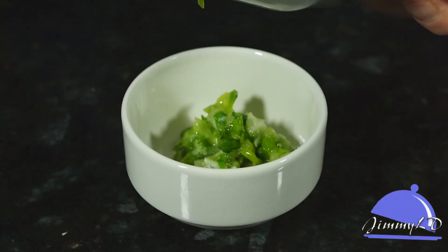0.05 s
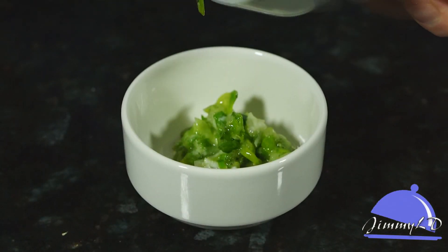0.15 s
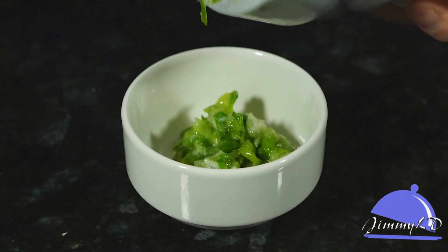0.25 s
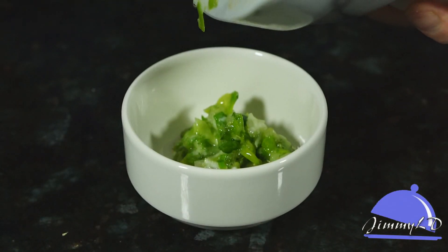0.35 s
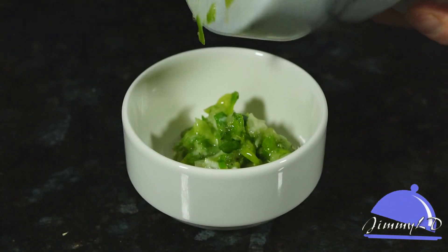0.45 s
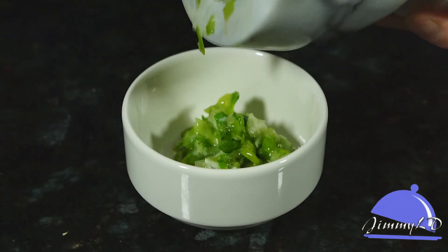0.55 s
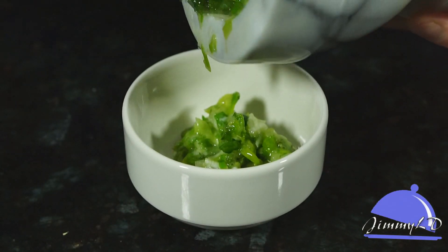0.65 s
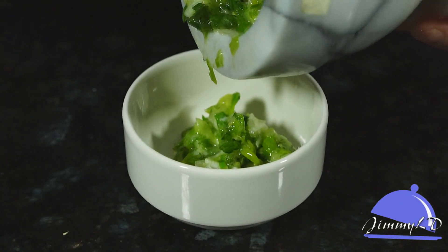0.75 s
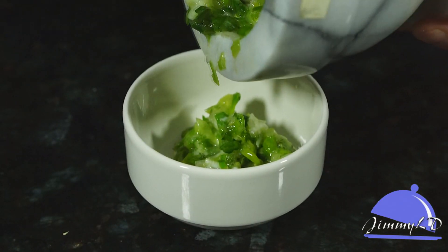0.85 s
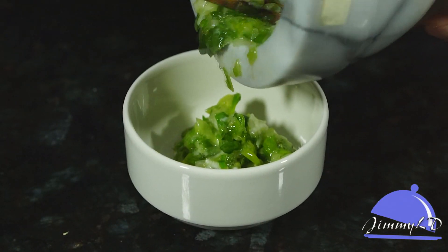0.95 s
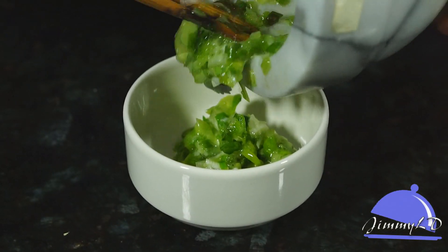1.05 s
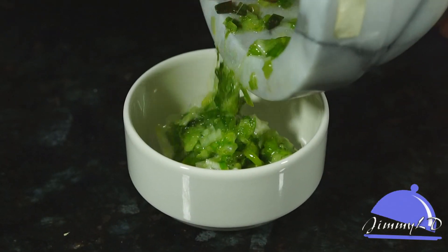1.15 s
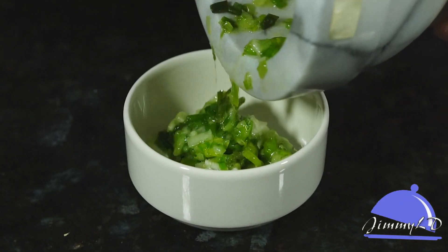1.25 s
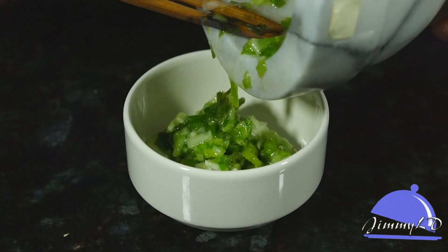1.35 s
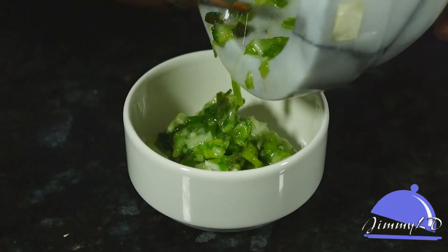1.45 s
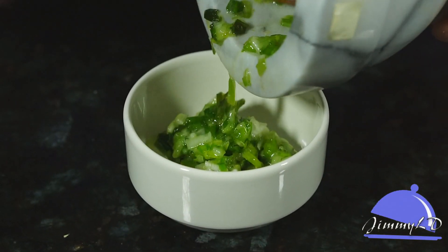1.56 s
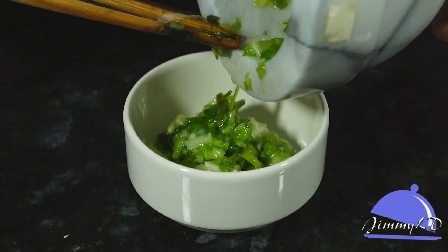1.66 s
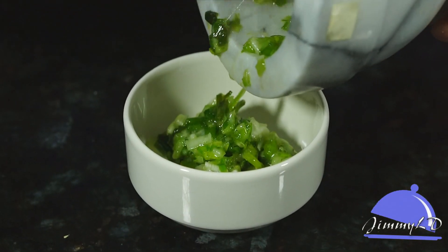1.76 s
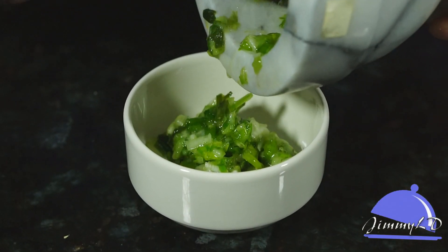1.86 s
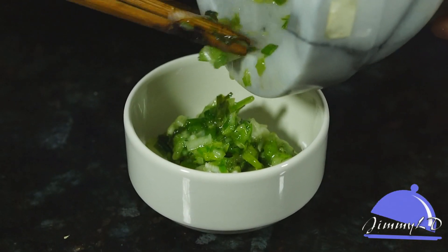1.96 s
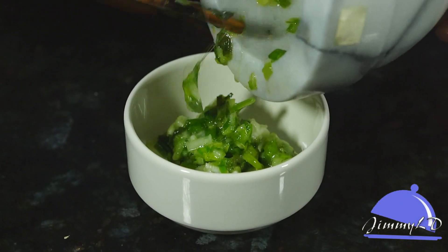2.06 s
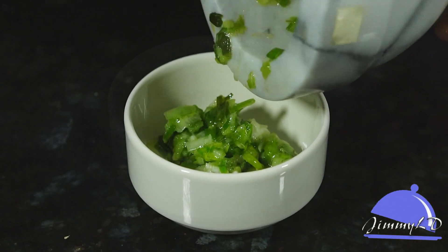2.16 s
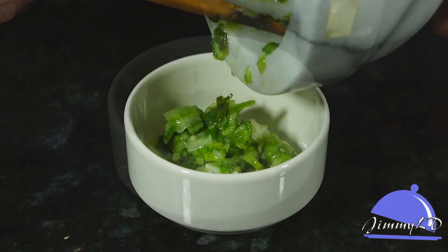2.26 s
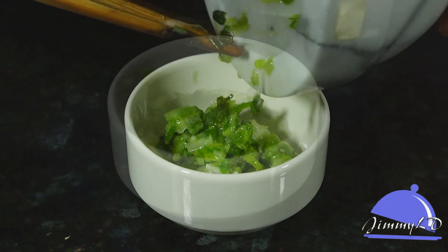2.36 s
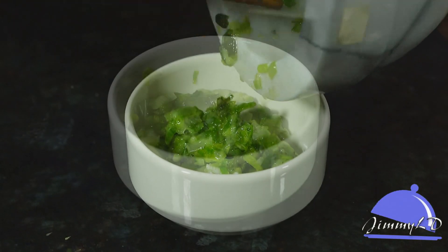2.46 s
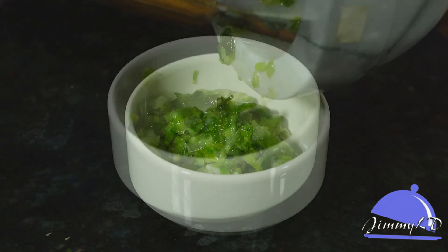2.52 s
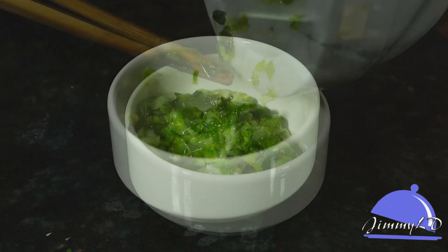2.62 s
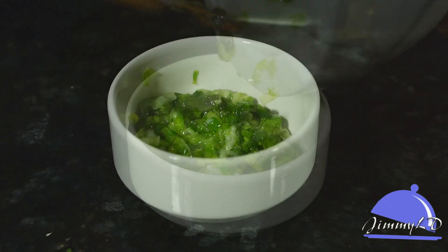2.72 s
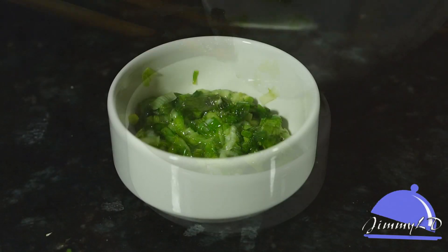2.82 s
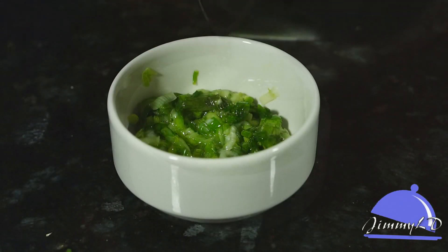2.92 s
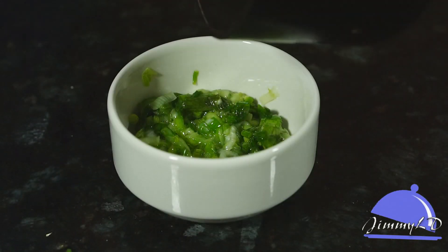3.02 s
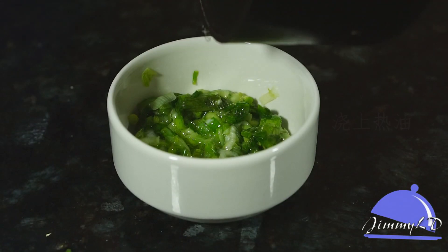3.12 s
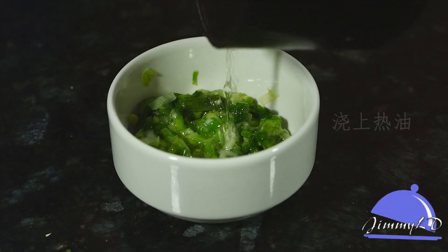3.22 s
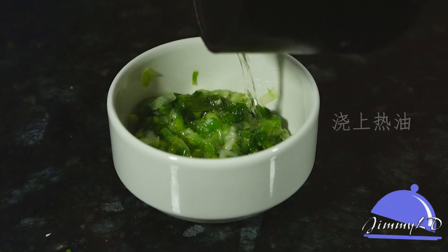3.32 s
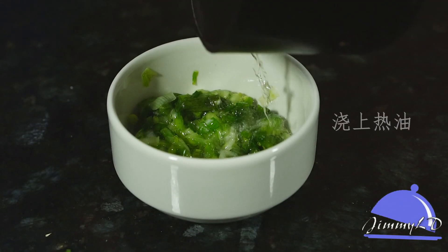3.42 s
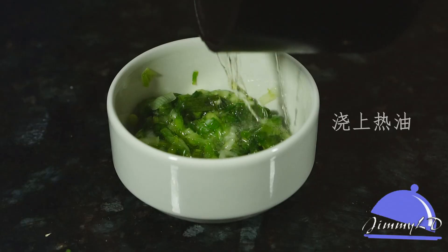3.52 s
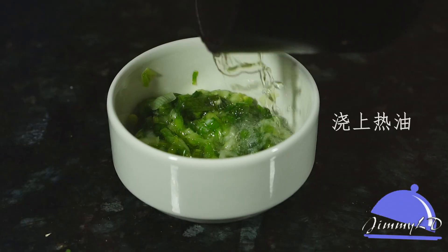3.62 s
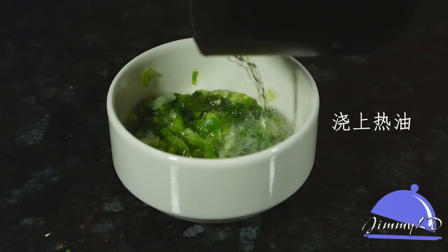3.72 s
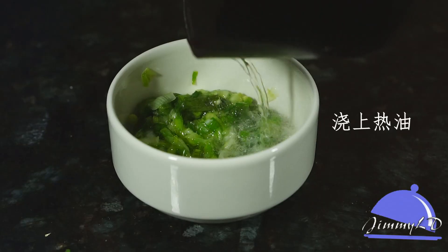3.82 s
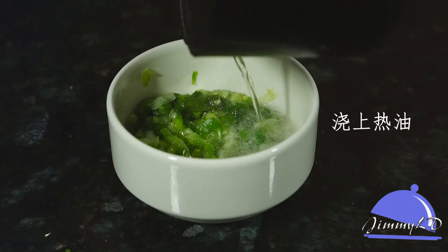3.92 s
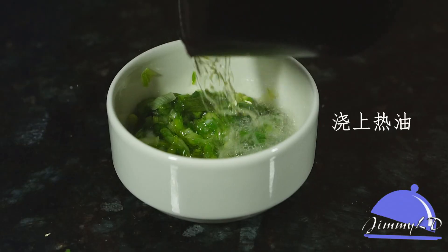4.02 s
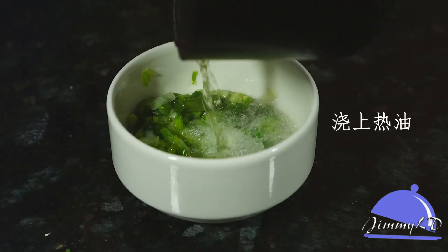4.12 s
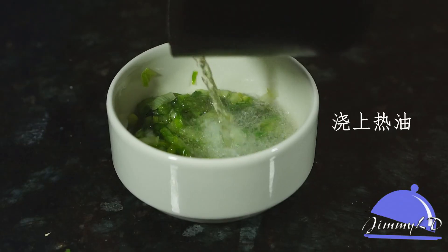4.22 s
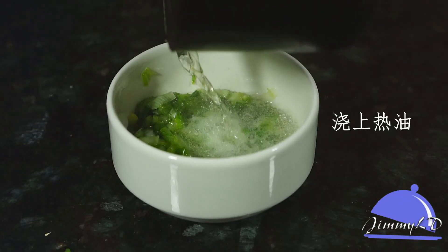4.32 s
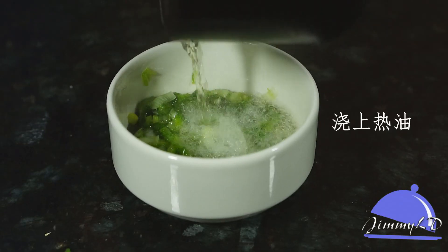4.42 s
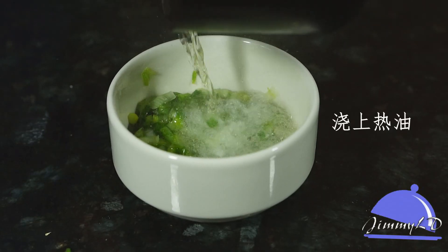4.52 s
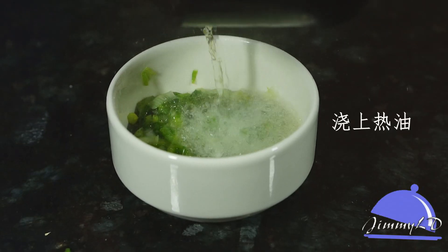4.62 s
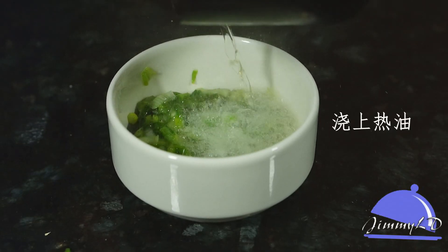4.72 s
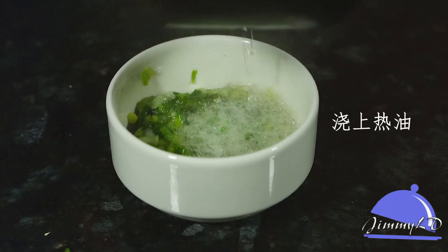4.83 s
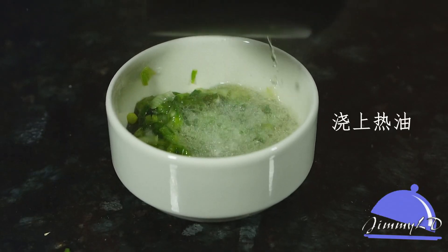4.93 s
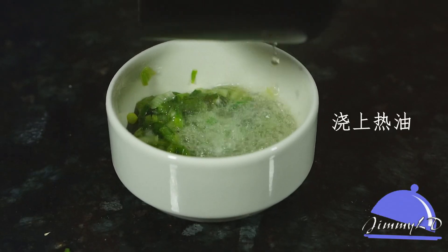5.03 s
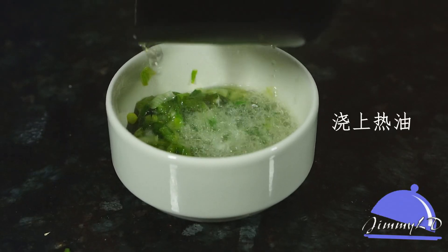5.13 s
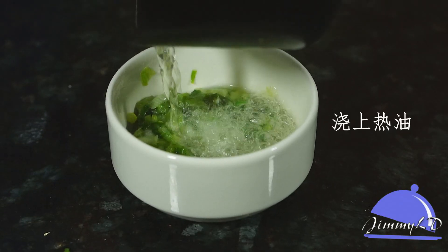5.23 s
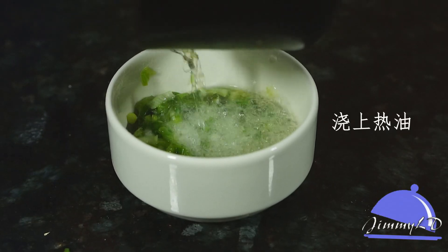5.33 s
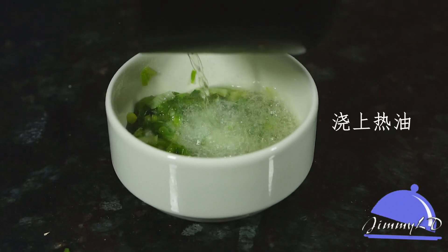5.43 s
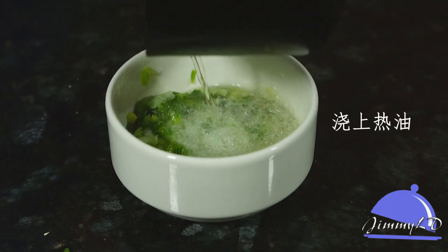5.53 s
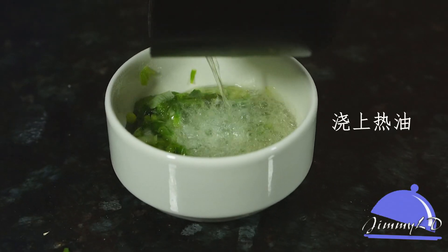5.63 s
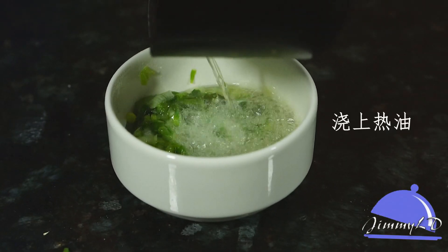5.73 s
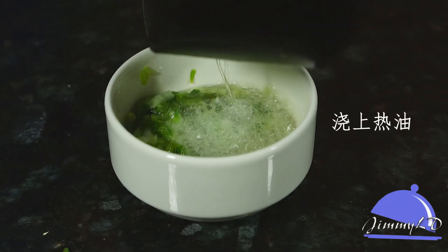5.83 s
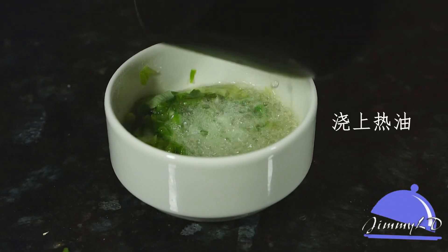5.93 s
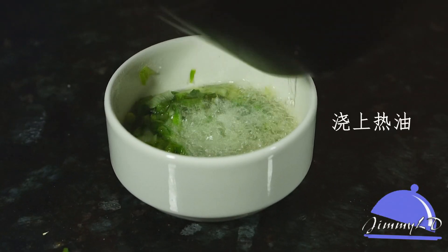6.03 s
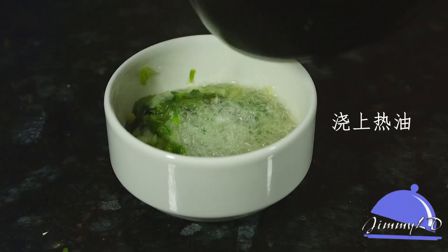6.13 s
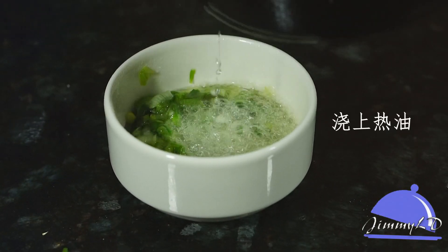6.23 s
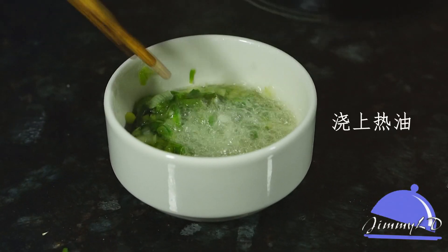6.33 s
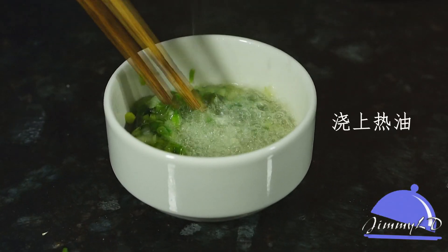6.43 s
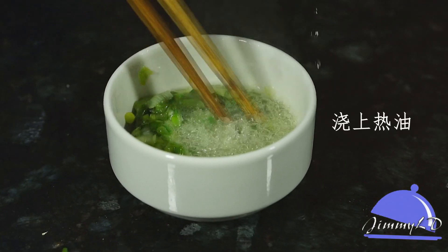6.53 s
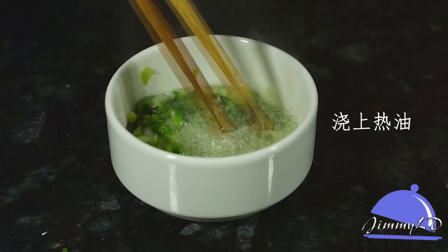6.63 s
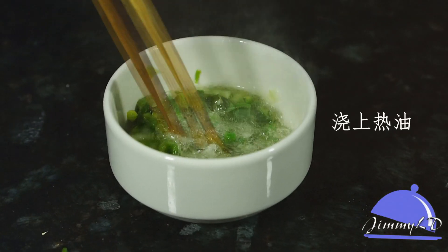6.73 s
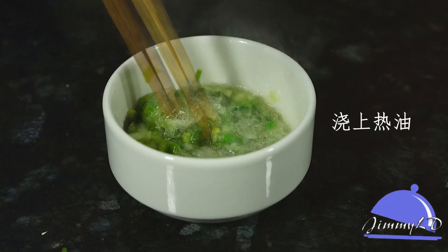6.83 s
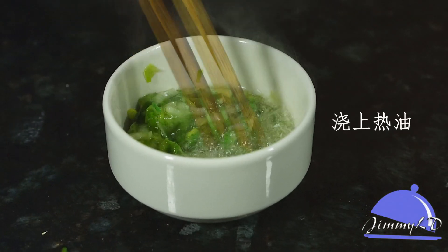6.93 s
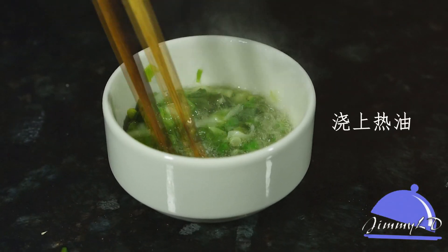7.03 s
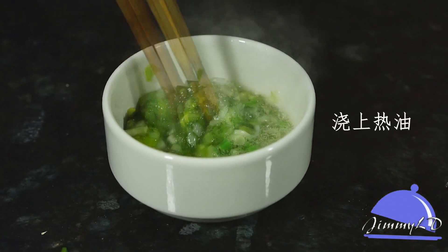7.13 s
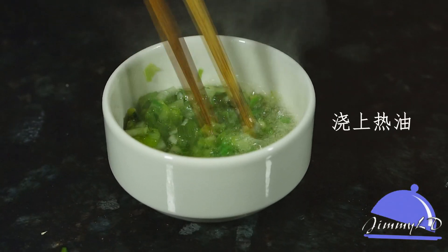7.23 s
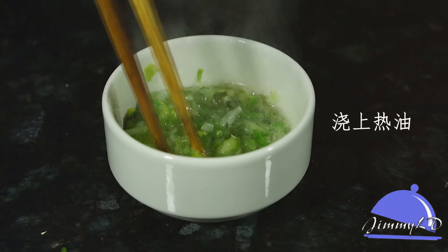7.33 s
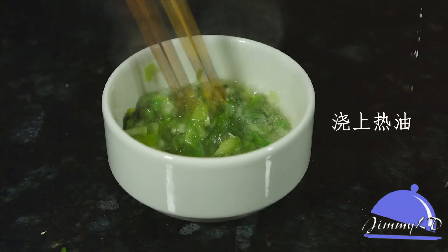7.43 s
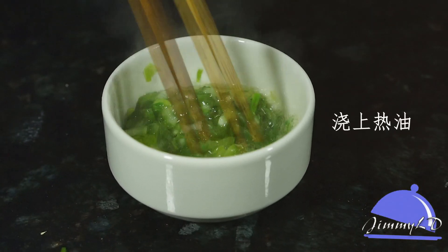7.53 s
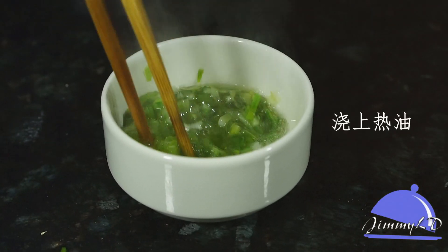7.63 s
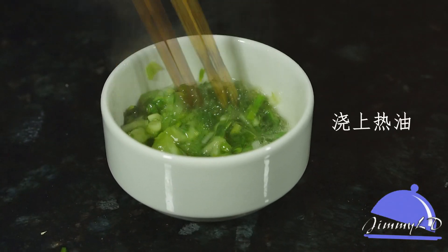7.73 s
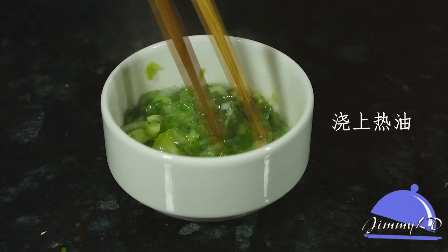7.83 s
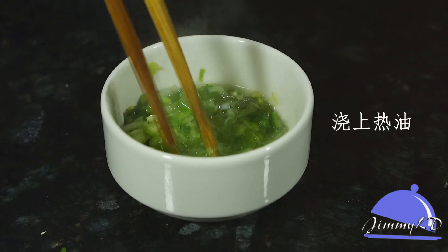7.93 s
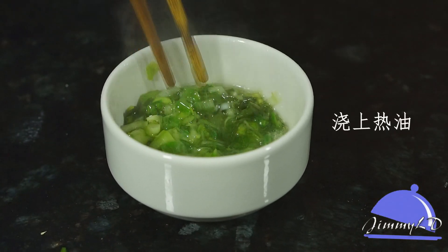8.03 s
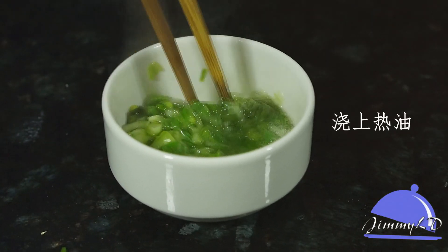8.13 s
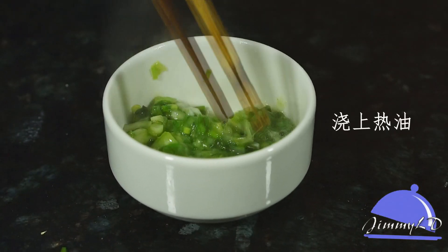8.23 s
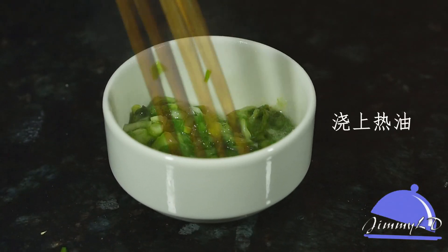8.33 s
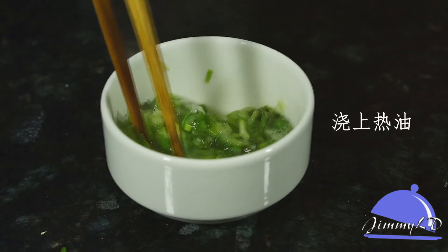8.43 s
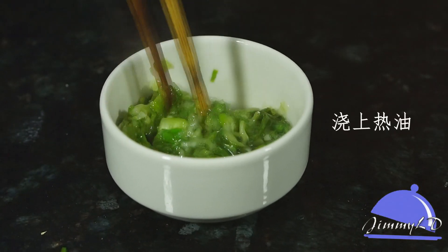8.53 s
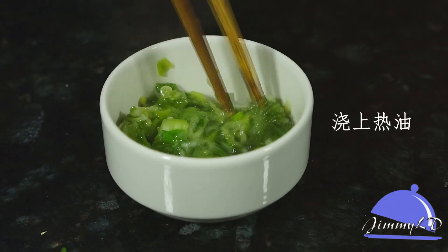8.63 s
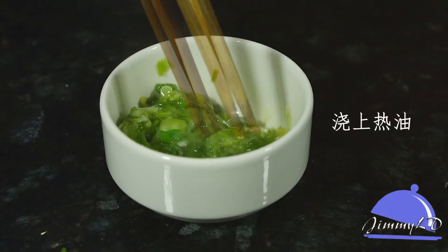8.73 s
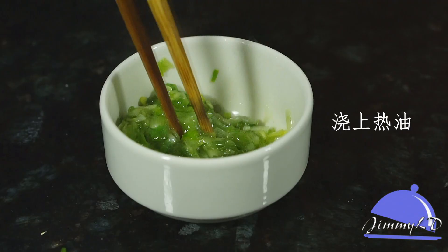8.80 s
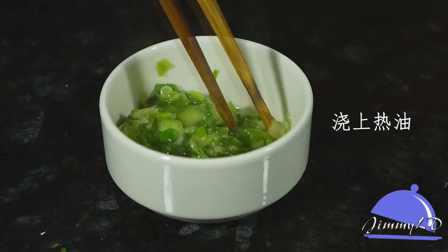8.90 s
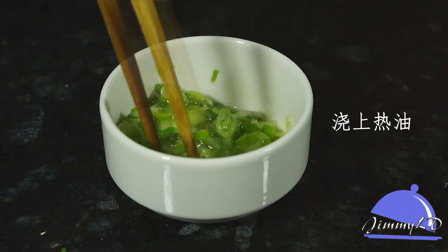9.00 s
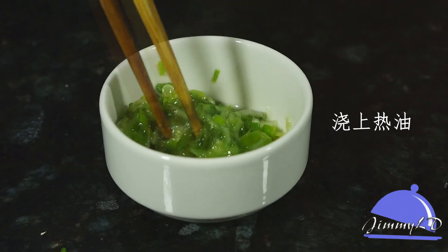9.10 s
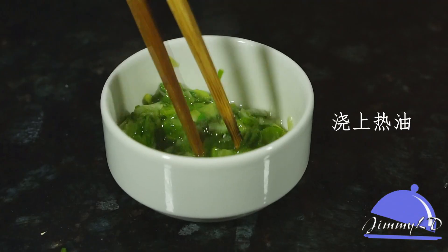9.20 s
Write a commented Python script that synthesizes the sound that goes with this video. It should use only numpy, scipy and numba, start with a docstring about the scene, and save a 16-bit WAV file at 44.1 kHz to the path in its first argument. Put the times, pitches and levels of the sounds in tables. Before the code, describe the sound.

A close stereo microphone in a small kitchen, with a faint fan-like hum. From 0 to 1 second, wooden chopsticks tap a stone mortar slightly left: crisp clustered ticks, hollow cup knocks, a thin high stone ring near 0.5, and short gritty scrapes. Softer, sparser taps and scrapes continue to about 3.1. At 3.4 hot oil meets wet herb paste and a bright spitting sizzle leaps up, thickening with froth and faint gurgling. It surges in flares, strongest around 4.5 to 5, and spits afresh at 5.35. From 6.4 sharp crackles and pops stand out; a chopstick knocks the oil-filled bowl dully at 6.7. The sizzle thins quickly after 7, breaking into scattered bursts by 8. Two more knocks come at 8.3 and 8.5, the second clickier, then a tiny tap near 9 as the last fizz fades into hum at 9.3.

```python
"""Kitchen: wooden chopsticks tap and scrape herb paste out of a stone mortar, left of a close stereo microphone.
Taps and scrapes are chattering or gritty forces on ringing modes of stone and hollow cup.
Hot oil is then poured on the paste in a small bowl: thousands of random bubble rings spit, froth and gurgle,
and die down while chopsticks knock the bowl. A fan-like hum of banded noise fills the background."""
import sys
import numpy as np
from scipy import signal
from scipy.fft import rfft, irfft, next_fast_len
from scipy.io import wavfile
from scipy.ndimage import uniform_filter1d
from numba import njit

SR = 44100
rng = np.random.default_rng(int(sys.argv[2]) if len(sys.argv) > 2 else 0)


def invert_db(x):
    """Field ratio 10**(x/20) for x, a level in decibels (scalar or array-like)."""
    u = np.asarray(x, float) / 20
    return 10 ** u


def file_out(sig):
    """Save sig as 16-bit WAV at sys.argv[1]."""
    # one column per channel
    cols = np.atleast_2d(sig).T
    # limit, then scale
    lim = np.clip(cols, -1, 1)
    pcm = np.round(lim * 32767).astype(np.int16)
    wavfile.write(sys.argv[1], SR, pcm)


N = 408354
T = np.arange(N) / SR


def unit(x):
    """Scale to rms 1."""
    return x / np.sqrt(np.mean(x ** 2))


def peak(x, db):
    """Scale the largest magnitude to a level."""
    return x * invert_db(db) / np.max(np.abs(x))


def curves(table):
    """Value columns of a time table as sample-rate curves; -120 dB outside it."""
    s, *columns = np.transpose(table)
    return [np.interp(T, s, c, left=-120, right=-120) for c in columns]


def colour(x, points, bands=(), bands_db=0, lo_hz=1, hi_hz=SR):
    """Filter by a spectrum of points plus resonant bands, between two edges; rms 1."""
    size = next_fast_len(N)
    hz = np.arange(1, size // 2 + 2) * SR / size
    point_hz, point_db = np.transpose(points)
    power = invert_db(2 * np.interp(np.log(hz), np.log(point_hz), point_db))
    for centre_hz, width_hz, db in bands:
        power = power + invert_db(2 * (db + bands_db)) / (1 + (2 * (hz - centre_hz) / width_hz) ** 2) ** 2
    power = power / (1 + (lo_hz / hz) ** 6) / (1 + (hz / hi_hz) ** 12)
    return unit(irfft(rfft(x, size) * np.sqrt(power), size)[..., :N])


@njit
def add(out, start, hz, t60, size, glide):
    """Add decaying sines; glide = relative rise of pitch over the ring."""
    for k in range(len(start)):
        steps = min(int(t60[k] * SR), len(out) - start[k])
        z = size[k] + 0j
        p = np.exp(2j * np.pi * hz[k] / SR - np.log(1000) / (t60[k] * SR))
        turn = np.exp(2j * np.pi * hz[k] * glide / (SR * SR * t60[k]))
        for i in range(steps):
            out[start[k] + i] += z.imag
            z *= p
            p *= turn


def ring(force, modes):
    """A force drives decaying modes (pitch_hz, level_db, t60_s)."""
    t = T[:SR // 2]
    body = sum(invert_db(db) * np.exp(-np.log(1000) * t / t60) * np.sin(2 * np.pi * hz * t) for hz, db, t60 in modes)
    return signal.oaconvolve(force, body)[:len(force)]


def bubbles(count, lo_hz, hi_hz, cycles, spread_db, glide):
    """Random bubbles: many small, a few large; each rings some cycles as it bursts."""
    when, pitch, rank, length = rng.random((count, 4)).T
    start = (when * N).astype(np.int64)
    hz = lo_hz + (hi_hz - lo_hz) * pitch
    t60 = cycles * (.5 + length) / hz
    big = np.minimum(-np.log(1 - rank), 5.5)
    size = invert_db((big - 1.5) * spread_db[start]) / np.sqrt(t60)
    out = np.zeros(N)
    add(out, start, hz, t60, size, glide)
    return out


def walk(rate_hz):
    """Random levels held 1 / rate_hz and slewed twice; spread near 1."""
    k = int(SR / rate_hz)
    held = np.repeat(rng.standard_normal(N // k + 1), k)
    return 1.31 * uniform_filter1d(uniform_filter1d(held, k), k)[:N]


def thin(x, hz):
    """Small things radiate no bass: high-pass."""
    return signal.sosfilt(signal.butter(3, hz, "high", fs=SR, output="sos"), x)


def place(table, sounds):
    """Start each sound at the time of its row."""
    out = np.zeros(N + SR)
    for row, sound in zip(table, sounds):
        out[int(row[0] * SR):][:len(sound)] += sound
    return out[:N]


def sides(pan_db):
    """Left and right gains for a left-minus-right level."""
    return invert_db(np.array([[pan_db], [-pan_db]]) / 2)


def room(x, t60, wet_db, side_db):
    """Counter and walls send back a tail, other in each ear; its bright part dies four times as fast."""
    t = T[:SR // 2]
    bright, dull = rng.standard_normal((2, 2, len(t)))
    dull = signal.sosfilt(signal.butter(2, 2500, fs=SR, output="sos"), dull)
    decay = np.exp(-np.log(1000) * t / t60)
    mid, side = dull * decay + bright * decay ** 4
    tails = np.array([mid + invert_db(side_db) * side, mid - invert_db(side_db) * side])
    tails = tails / np.sqrt(np.sum(mid ** 2))
    return x + invert_db(wet_db) * signal.oaconvolve(x, tails, axes=1)[:, :N]


# chopstick taps on mortar; the 0.473 s row is mostly a stone ring under a scrape:
# start_s, tick_db, ring_db, knock_db (ring and knock relative to tick)
TAP_HITS = [(.0034, -13.5, -67, -17), (0.0095, -16.5, -60, -7.5), (0.245, -11.5, -63, -3),
            (0.2528, -17.5, -62, -35), (0.4425, -14.5, -18, -14.5), (0.446, -11.5, -18, -29.5),
            (0.473, -35, 0, -20.5), (0.662, -16.5, -8.5, -11), (0.756, -25, -9, -12),
            (0.9692, -29, -12.5, -3.5), (1.4135, -32, -17, -11), (1.6511, -19, -14, -8),
            (2.02, -20, -20, -18), (2.3645, -20, -30, -10), (2.689, -28, -21, -14),
            (2.917, -26, -20, -11.5), (2.922, -35.5, -56, -5), (3.12, -39.5, -35, -14)]
# stone modes: pitch_hz, level_db, t60_s
STONE_MODES = [(4241, -2, .08), (4243, -3, .38)]
# modes of the air in the cup: pitch_hz, level_db, t60_s
CUP_MODES = [(1035, 9.5, 0.0093), (1923, 3.5, 0.0077), (2110, 4.5, 0.0038)]
RIM_FROM_S = .4  # later taps land near the rim and knock thinner


def taps():
    """Each contact chatters for some milliseconds: a broad tick, the cup's knock and the long stone ring."""
    t = T[:SR // 2]
    push = (t == 0) * 1.
    tick_modes = [(4800, -21.0, 0.0018), (9030, -2.0, 0.00052)]  # pitch_hz, level_db, t60_s
    blows, rings = [], []
    for start_s, tick_db, ring_db, knock_db in TAP_HITS:
        chatter = rng.standard_normal(len(t))
        tick_force = 1.1 * push + chatter * np.exp(-t / 0.0018)
        knock_force = push + 0.022 * chatter * np.exp(-t / 0.00017)
        tick = thin(ring(tick_force, tick_modes), 3200)
        knock = thin(ring(knock_force, CUP_MODES), 1000 if start_s < RIM_FROM_S else 1750)
        blows.append(peak(tick, tick_db) + peak(knock, tick_db + knock_db))
        rings.append(peak(thin(ring(push, STONE_MODES), 2800), tick_db + ring_db))
    waver = invert_db(2.5 * walk(30))  # the ring's level wavers at random
    contact = room(place(TAP_HITS, blows) * sides(4.8), 0.81, -10.0, -1.7)
    return contact + place(TAP_HITS, rings) * waver * sides(5.3)


# strokes over the stone: start_s, length_s, grit_db, rumble_db
STROKES = [(0.022, 0.071, -40, -46.5), (0.257, 0.07, -39.5, -45), (0.482, 0.076, -40.5, -61),
           (0.694, 0.098, -50, -66), (0.923, 0.15, -45, -58), (1.413, 0.16, -57, -62.5),
           (1.662, 0.14, -54, -62), (2.006, 0.11, -53.5, -69), (2.357, 0.084, -48, -66)]
# grit spectrum: freq_hz, density_db (per Hz)
GRIT_SPECTRUM = [(1470, -53), (2500, -12.5), (5000, -8.5), (8080, -10), (9440, -3), (16000, -8.5)]


def scrape():
    """Dense grit clicks under the stick; they also stir the cup's air."""
    clicks = rng.standard_normal(N) * invert_db(3.5 * walk(900) + 1.5 * walk(100))
    grit, rumble = np.zeros((2, N))
    for start_s, length_s, grit_db, rumble_db in STROKES:
        # pressure builds quickly, eases and lets go
        stroke = np.interp(T - start_s, [0, .012, length_s, length_s + 0.043], [0.033, 1, 0.43, 0.0044])
        grit = grit + invert_db(grit_db) * stroke
        rumble = rumble + invert_db(rumble_db) * stroke
    cup = thin(ring(clicks * rumble, CUP_MODES), 950) / np.std(ring(clicks, CUP_MODES))
    return room((grit * colour(clicks, GRIT_SPECTRUM) + cup) * sides(2.9), 0.49, -1.0, 1.6)


# oil spectrum: freq_hz, density_db (per Hz)
OIL_SPECTRUM = [(25, -34), (335, -28), (607, -28), (911, -10), (2910, -12), (5730, 0.5), (7710, 4),
                (14800, 6), (16000, 8)]
# resonances of the air in the bowl: centre_hz, width_hz, level_db
BOWL_AIR_BANDS = [(626, 163, -12), (2136, 370, -10.5), (3030, 930, -6), (7490, 1500, 3), (10420, 1400, 4.5),
                  (11830, 1200, 3.5)]
# strength of the boil, first drops, full stream, then cooling oil: time_s, level_db
BOIL_LEVEL = [(3.375, -87), (3.395, -33.5), (3.46, -33), (3.48, -27), (4.1, -25.5), (4.75, -23.5),
              (5.3, -29), (5.95, -26), (6.3, -28.5), (7.0, -30), (7.7, -38), (8.0, -43), (9.26, -62)]
# level of the froth, the 2-4 kHz body of the frying: time_s, level_db
FROTH_LEVEL = [(3.375, -80), (3.4, -49), (3.46, -48), (3.51, -32), (3.62, -38.5), (4.09, -37),
               (4.21, -30.5), (4.47, -34), (4.53, -29.5), (4.88, -32.5), (4.94, -27.5), (5.1, -31.5),
               (5.54, -33.5), (5.6, -30), (6.15, -29.5), (6.2, -33.5), (7.06, -34.5), (8.32, -53),
               (9.26, -71)]
# short bright pops in the sizzle, and a late chopstick tap at 8.957 s: start_s, peak_db, pitch_hz
BRIGHT_POPS = [(3.715, -14.5, 2830), (6.403, -7.5, 8450), (6.435, -14, 2820), (6.464, -10.5, 3600),
               (6.647, -13, 7000), (6.88, -13, 11900), (6.931, -13.5, 5730), (6.992, -10.5, 5500),
               (7.018, -16, 4660), (7.077, -17, 13000), (7.1237, -16, 8000), (7.141, -12, 3730),
               (7.222, -15.5, 4690), (7.334, -12, 7900), (7.3405, -10, 13500), (7.427, -16, 4000),
               (7.5854, -18, 8200), (7.644, -18, 5000), (7.7789, -17, 3350), (7.794, -15.5, 9600),
               (7.859, -17, 13500), (7.8994, -22, 6500), (8.9568, -33.5, 4700), (9.236, -36, 10000)]
GURGLE_DB = -13  # over the froth


def sizzle():
    """Spit, fizz, froth bubbles, fat gurgles and lone crackles follow the pour; spit, froth and fizz surge together."""
    boil_db, froth_db = curves(BOIL_LEVEL)[0], curves(FROTH_LEVEL)[0]
    flare_db, fizz_db = flares(), fizz_rise()
    # as the oil cools the bursts thin out: sizes spread wider
    spread_db = np.clip(0.6 + 0.45 * (T - 3), 1, 7)

    spitting = bubbles(count=60000, lo_hz=2820, hi_hz=16500, cycles=3.7, spread_db=spread_db, glide=0.092)
    foaming = bubbles(count=25000, lo_hz=700, hi_hz=8000, cycles=9., spread_db=.95 * spread_db, glide=.4)
    gurgling = bubbles(count=8000, lo_hz=249, hi_hz=2090, cycles=11.7, spread_db=0.08 * spread_db, glide=0.65)
    crackling = bubbles(count=1500, lo_hz=1500, hi_hz=14700, cycles=2.8, spread_db=spread_db, glide=0.)
    spit = colour(spitting, OIL_SPECTRUM, BOWL_AIR_BANDS, lo_hz=5800)
    froth = colour(foaming, OIL_SPECTRUM, BOWL_AIR_BANDS, lo_hz=1510, hi_hz=3690)
    fizz = colour(foaming, OIL_SPECTRUM, BOWL_AIR_BANDS, lo_hz=4220, hi_hz=6100)
    gurgle = colour(gurgling, OIL_SPECTRUM, BOWL_AIR_BANDS, hi_hz=1280)
    crackle = colour(crackling, OIL_SPECTRUM, BOWL_AIR_BANDS)

    surge_db = 0.84 * walk(90)
    spit_db = boil_db + surge_db + flare_db + 1.23 * walk(22)
    bubbling_db = froth_db + surge_db + 0.67 * walk(30)
    crackle_db = boil_db + flare_db - 11.0 + 0.88 * spread_db
    gains = invert_db([spit_db, bubbling_db, crackle_db, boil_db + surge_db + fizz_db, froth_db + GURGLE_DB])
    layers = np.array([spit, froth, crackle, fizz, gurgle])
    mid = np.sum(gains[:4] * layers[:4], axis=0)
    near_middle = gains[4] * gurgle

    # a rough band stands out during the first pour
    rough = unit(ring(foaming, [(4400, 0, 0.006)]))
    mid = mid + invert_db(boil_db - 14) * np.exp(-((T - 4.02) / 0.24) ** 4) * rough

    # the same bubbling, shifted half a second, widens the stereo
    shifted = np.roll(layers, SR // 2, axis=1)
    side_gain = invert_db([[-7.7], [-7.7], [-7.7], [-7.7], [-12]])
    side = np.sum(side_gain * gains * shifted, axis=0)

    t = T[:SR // 50]
    pops = []
    for start_s, peak_db, pitch_hz in BRIGHT_POPS:
        tone = np.sin(2 * np.pi * pitch_hz * t) * np.exp(-t * pitch_hz / 4.4)
        noise = 0.37 * rng.standard_normal(len(t)) * np.exp(-t / 0.002)
        pops.append(peak(thin(tone + noise, 1400), peak_db))
    left_of_middle = (mid + place(BRIGHT_POPS, pops)) * sides(2.1)
    return room(left_of_middle + near_middle * sides(.4) + side * np.array([[1], [-1]]), .2, -18, -3)


# sudden rises of spitting; the last and largest may be a new pour: start_s, rise_db (before the fade)
FLARE_STARTS = [(3.469, 2.5), (3.68, 2.5), (4.18, 3), (4.48, 2.5), (4.93, 3.5), (5.35, 7.5)]


def flares():
    """Each flare of spitting rises fast and fades exponentially; dB of spit over the boil."""
    rise_s, fade_s = 0.0091, 0.25
    start_s, rise_db = np.transpose(FLARE_STARTS)
    since_s = np.maximum(T - start_s[:, None], 0)
    return rise_db @ ((1 - np.exp(-since_s / rise_s)) * np.exp(-since_s / fade_s))


def fizz_rise():
    """Fizz rises over the boil along a saturating curve begun just before the pour; dB over the boil."""
    start_s, build_s = 2.97, 0.95
    first_db, full_db = -35, -9.5
    rise = 1 - np.exp(-np.maximum(T - start_s, 0) / build_s)
    return first_db + (full_db - first_db) * rise


# chopstick on bowl: start_s, knock_db, click_db (click relative to knock)
BOWL_HITS = [(6.726, -25, -15), (8.279, -34.5, -20), (8.5006, -24, 1.5)]
# modes of the oil-damped bowl: pitch_hz, level_db, t60_s
BOWL_MODES = [(520, -10, 0.028), (960, 8, 0.027), (1080, 6, 0.024), (2850, -18, 0.0039),
              (4500, -16, 0.0035)]
# soft low swells as paste or bowl shifts: start_s, pitch_hz, level_db
SHIFT_SWELLS = [(1.41, 445, -60.5), (5.809, 366, -48.5), (8.2, 450, -63), (8.9, 160, -76)]


def stirs():
    """Chopsticks knock and rattle on the oil-damped bowl; paste and bowl shift with soft low swells."""
    t = T[:SR // 2]
    push = np.sin(np.pi * np.minimum(t / 0.00013, 1))
    knocks = []
    for start_s, knock_db, click_db in BOWL_HITS:
        chatter = rng.standard_normal(len(t))
        rattle = chatter ** 3  # cubing makes it sparse
        knock_force = push + 0.055 * chatter * np.exp(-t / 0.0045) + 0.0044 * rattle * np.exp(-t / .04)
        click_force = chatter * np.exp(-t / 0.00059) + 0.0082 * rattle * np.exp(-t / 0.057)
        knock = peak(ring(knock_force, BOWL_MODES), knock_db)
        click = peak(ring(click_force, BOWL_MODES[4:]), knock_db + click_db)
        knocks.append(knock + click)
    swells = []
    for start_s, pitch_hz, level_db in SHIFT_SWELLS:
        rumble = ring(rng.standard_normal(len(t)), [(pitch_hz, 0, 7 / pitch_hz)])
        swell = np.exp(-(t / 0.067 - 2) ** 2)
        swells.append(invert_db(level_db) * swell * unit(thin(rumble, pitch_hz)))
    dry_stirs = thin(place(BOWL_HITS, knocks), 400) + place(SHIFT_SWELLS, swells)
    return room(dry_stirs * sides(1.1), 0.6, -11, -3)


# hum level: time_s, level_db
HUM_LEVEL = [(0, -52.5), (2.2, -50.5), (2.7, -53), (3.3, -61), (9.26, -55.5)]
# hum noise bed: freq_hz, density_db (per Hz)
HUM_SPECTRUM = [(25, -31), (405, -6), (659, -8.5), (1160, -3), (1890, -10.5), (4250, -13.5), (9840, -14),
                (16000, -17)]
# narrow hum bands: centre_hz, width_hz, level_db (before the common bands_db)
HUM_RESONANCES = [(408, 100, -7.5), (900, 140, -3), (1180, 82, -4), (2450, 290, -9), (4330, 94, -5),
                  (9740, 410, -4), (10620, 520, -9), (13600, 170, -7)]


def hum():
    """Steady air noise with narrow resonant bands; its level wavers slowly."""
    mid, side = colour(rng.standard_normal((2, N)), HUM_SPECTRUM, HUM_RESONANCES, bands_db=4.5)
    level = invert_db(curves(HUM_LEVEL)[0] + 2.0 * walk(6.4))
    return level * np.array([0.72 * mid + .5 * side, 0.49 * mid - .5 * side])


def scene():
    """Mortar first, then oil and bowl, over the kitchen hum."""
    return taps() + scrape() + sizzle() + stirs() + hum()


def roll_off(x):
    """The treble ends steeply here."""
    return signal.sosfilt(signal.butter(12, 17010, fs=SR, output="sos"), x)


def record(dry):
    """A steep elliptic low-pass cuts the top."""
    top_hz = 15750
    low_pass = signal.ellip(12, .2, 60, top_hz, fs=SR, output="sos")
    mix = signal.sosfilt(low_pass, dry)
    return roll_off(mix)


dry = scene()
out = record(dry)
file_out(out)
```